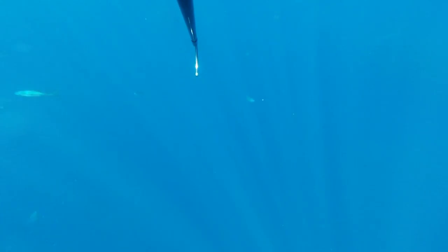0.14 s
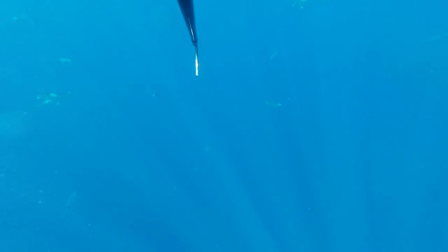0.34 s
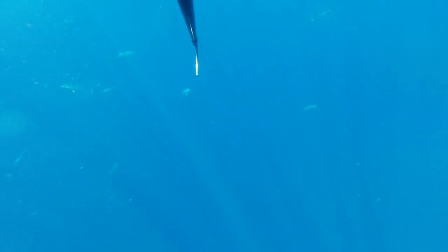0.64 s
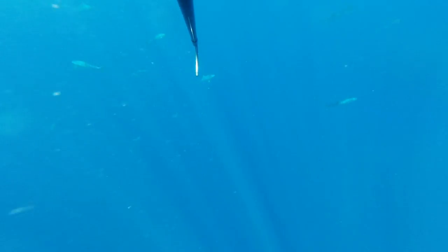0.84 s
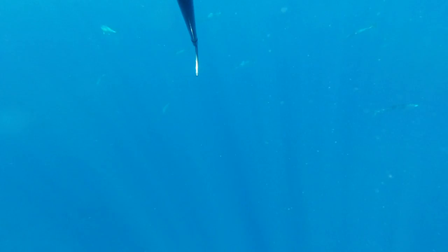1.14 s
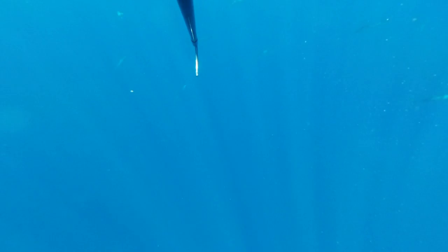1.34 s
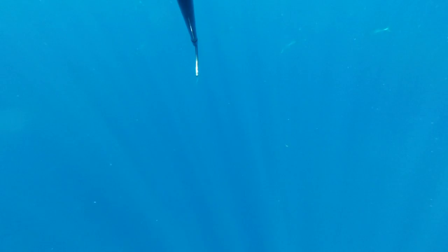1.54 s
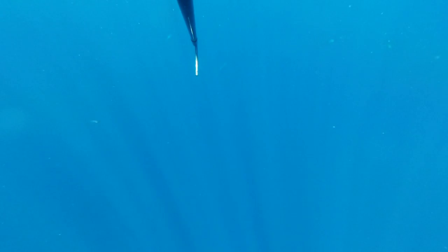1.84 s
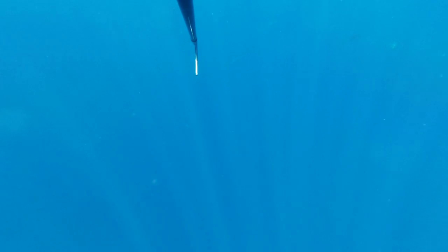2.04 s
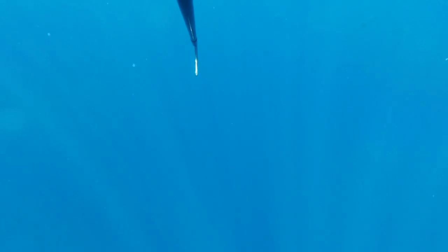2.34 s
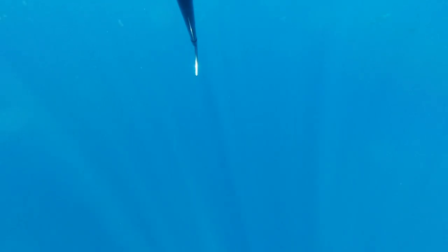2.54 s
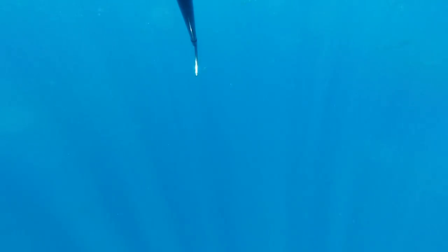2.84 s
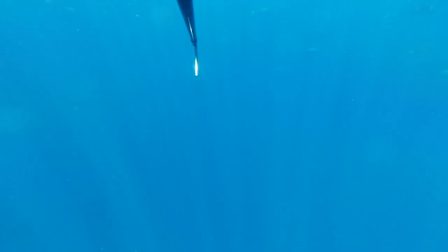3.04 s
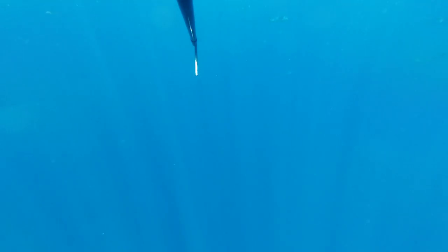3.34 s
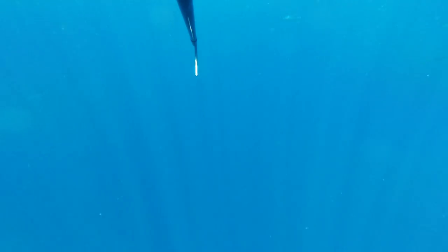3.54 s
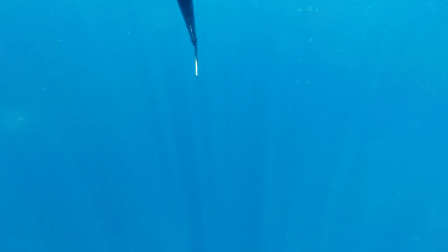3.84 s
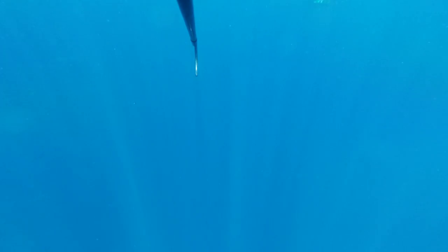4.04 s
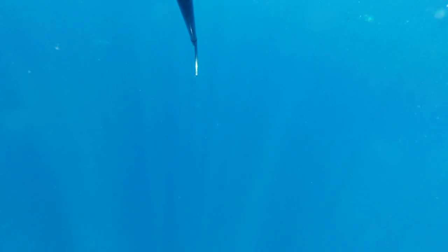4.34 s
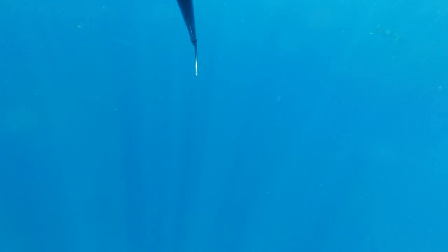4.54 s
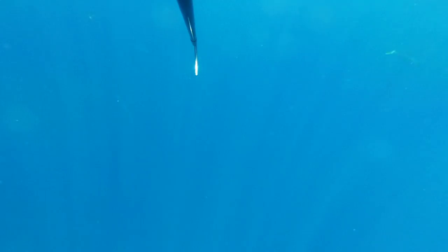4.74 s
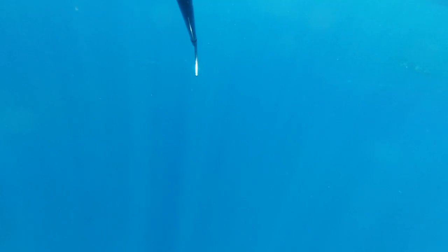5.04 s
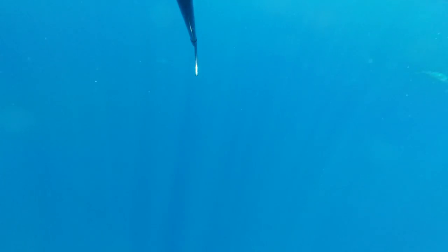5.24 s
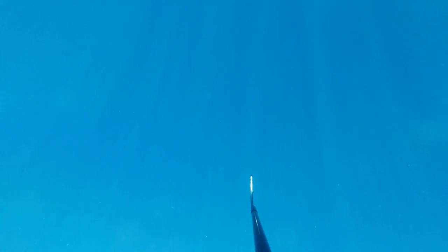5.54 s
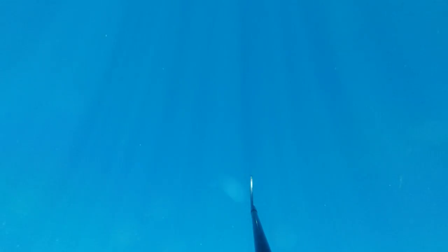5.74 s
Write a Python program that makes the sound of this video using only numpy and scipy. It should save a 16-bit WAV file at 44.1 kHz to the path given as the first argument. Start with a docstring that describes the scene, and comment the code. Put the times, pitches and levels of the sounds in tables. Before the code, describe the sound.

Muffled water flows around a pole and sealed housing, heard very close underwater: a low, lumpy rumble with a faint, steady fizz of bubbles. A small slosh and light clicks come at about 0.4 seconds. At 1.35 seconds a dull, deep blow leaves the pole ringing low, and the flow grows into a wavering hum. From 2.1 to 2.4 seconds comes the loudest event, a quick rattle of sharp knocks and hollow pops with a short wash of water. The drone continues, with a tick and a soft thud around 3.6 seconds, then dips near 4.3. Scattered dry ticks and small knocks run from 4.5 to 5.2 seconds as the flow returns. A light slosh and a sharper popping knock follow around 5.3, then a low, hollow bump at 5.6. The clicks and fizz carry a thin, gritty treble edge.

```python
"""Flowing water drums a pole and its sealed camera housing at their low modes, heard close, under water.
Eddies keep two modes swinging; fine bubbles and grit ring the shell. Water sloshes, the gear knocks,
rattles and ticks, short pops sound, and dull blows leave the pole ringing low. A sample-and-hold
at 8000 Hz mirrors every sound in the treble."""
import sys
import numpy as np
from scipy import signal
from scipy.fft import rfft, irfft, next_fast_len
from scipy.io import wavfile
from scipy.ndimage import uniform_filter1d, map_coordinates

SR = 44100
rng = np.random.default_rng(int(sys.argv[2]) if len(sys.argv) > 2 else 0)


def put_to_file(sound):
    """Save the sound as 16-bit audio at rate SR, in the file named by the first command-line argument."""
    columns = np.atleast_2d(sound).T  # one column per channel
    safe = np.clip(columns, -1, 1)
    whole_steps = np.round(safe * 32767)
    wavfile.write(sys.argv[1], SR, whole_steps.astype(np.int16))


N = 259308

# water pushing the pole: time_s, strength_db
FLOW_STRENGTH = [(0, -56.5), (.13, -54.5), (.43, -55.5), (.6, -51.5), (1.0, -57.5), (1.34, -55.5),
                 (1.35, -45), (1.75, -45.5), (2.1, -41.5), (2.27, -46), (2.4, -42), (2.68, -46.5),
                 (2.87, -39.5), (3.15, -44), (3.41, -40), (3.55, -48), (3.9, -41), (4.18, -44), (4.3, -56),
                 (4.43, -61), (4.67, -54), (5.16, -46.5), (5.45, -47), (5.88, -50)]
# low modes of pole and housing, four groups: freq_hz, width_hz, gain_db
POLE_MODES = [
    [(33.4, 6, -3), (49.4, 11.6, -6.5), (62, 5.3, -3.5), (97.3, 7.9, -2.5)],
    [(144.1, 3.3, 2.5), (171, 60, -7), (191.2, 3.5, -0.5)],
    [(235.4, 9.4, 0.5), (251.3, 23.4, -2)],
    [(303, 18.3, 1.5), (337, 58, 2.5), (385.6, 10, 8.5), (402, 55, -11), (440.5, 5.4, 10.5), (520, 30, -34)],
]
# flow response per pole group: gain_db, swing_ratio, wander_db, low_hz, high_hz
POLE_GROUPS = [(1, 1.23, 1.2, 40, 97), (-2, 1.17, 2.5, 98, 195), (-5.5, 0.84, 3.5, 195, 210),
               (-6.5, .5, 2.5, 256, 507)]
# lower eddy-driven mode: time_s, level_db
SWAY_LEVEL = [(0, -58), (.2, -51), (.34, -43), (.42, -56.5), (.66, -48.5), (.9, -54.5), (1.34, -46.5),
              (1.35, -29), (1.45, -31), (1.6, -38.5), (1.7, -42), (2.0, -57), (2.21, -41), (2.28, -64.5),
              (2.5, -44), (2.6, -54.5), (3.05, -45), (3.5, -38), (3.62, -47), (3.82, -36.5), (3.94, -44.5),
              (4.16, -49), (4.25, -62), (5.0, -57), (5.64, -45), (5.88, -48)]
# upper eddy-driven mode: time_s, level_db
DRONE_LEVEL = [(0, -56), (.66, -60.5), (1.34, -63), (1.35, -56), (1.5, -47), (1.58, -57), (1.69, -42),
               (2.02, -38.5), (2.2, -48), (2.31, -38.5), (2.45, -40), (2.52, -46.5), (2.78, -42),
               (3.0, -45.5), (3.1, -59), (3.45, -47.5), (3.66, -56), (3.72, -44), (4.16, -40.5),
               (4.25, -65), (4.5, -73), (4.76, -56.5), (4.98, -48.5), (5.12, -54), (5.3, -48.5),
               (5.45, -57), (5.64, -51), (5.88, -64)]
# bubbles and grit on the shell: time_s, level_db
FIZZ_LEVEL = [(0.0, -48), (0.36, -48.5), (0.59, -47), (1.13, -49), (1.42, -51), (2.06, -53), (2.18, -54),
              (2.29, -49), (3.91, -47), (4.24, -51.5), (4.52, -52), (4.9, -45), (5.17, -45), (5.88, -47)]
# shell modes, low and high group: freq_hz, width_hz, gain_db
SHELL_MODES = [
    [(656, 106, -0.5), (850, 62, 4.5), (881.6, 31, 10.5), (1082, 25, 15), (1186, 154, 3.5)],
    [(1462, 120, 1.5), (1531, 140, 1.5), (1715, 103, 2), (1868, 210, -0.5), (1952, 37, 6), (2111, 59, 5.5),
     (2330, 75, 3)],
]
# shell roll-off above its last modes: freq_hz, gain_db
SHELL_ROLLOFF = [(2230, -1.5), (2320, -2), (2480, -18), (2560, -9)]
# thin hiss spectrum: freq_hz, gain_db
HISS_SPECTRUM = [(2200, 4), (2550, -3), (2750, -3), (2950, -5), (3250, -5.5), (3600, -11.5), (3850, -13),
                 (4000, -19.5)]
# sloshes over the shell: start_s, level_db, t60_s, low_hz, high_hz
SLOSHES = [(0.376, -48, .18, 665, 1150), (.471, -49, 0.1, 300, 500), (.655, -54.5, 0.076, 2500, 3650),
           (2.126, -47, 0.031, 1500, 3700), (2.146, -27, 0.019, 500, 3600), (2.172, -27, 0.031, 500, 3620),
           (2.252, -57, 0.14, 694, 3250), (2.34, -46, .095, 705, 1150), (2.688, -44.5, 0.2, 810, 1980),
           (5.12, -40.5, 0.18, 684, 1430), (5.325, -43.5, 0.084, 700, 2330)]
# gear knocks: start_s, level_db, centre_hz, reach_octaves, ring_ratio
KNOCKS = [(.385, -34, 1020, .3, 0.67), (0.411, -37, 1024, 0.17, 3.2), (.424, -33.5, 2240, 0.16, 0.63),
          (1.35, -29, 450, 0.8, 0.87), (1.685, -33.5, 905, 0.16, 0.77), (1.944, -32.5, 2240, 0.18, 0.9),
          (2.143, -25.5, 1330, .6, 1.05), (2.145, -13.5, 3320, .1, 1.4), (2.158, -21, 1310, .6, 0.56),
          (2.171, -11, 1100, .5, 0.24), (2.174, -13, 2150, .1, 1.6), (2.179, -5.5, 2300, .4, 0.79),
          (2.1815, -5, 2000, .12, 0.93), (2.183, 0, 2200, .1, 0.78), (2.1842, -1, 2860, 0.17, 0.83),
          (2.214, -26.5, 2050, .2, 0.48), (2.232, -23.5, 1490, 0.42, 0.83), (2.263, -29, 920, .15, 0.85),
          (2.264, -19.5, 1940, 0.14, 0.69), (2.271, -31, 1600, .3, 1.8), (2.316, -32.5, 1890, .2, .9),
          (2.375, -37, 1720, .1, 2.5), (4.024, -33, 1640, 0.13, 1.1), (4.487, -41, 2120, 0.17, 1.2),
          (4.508, -39, 2080, .15, .9), (4.553, -40, 1930, 0.14, 1.6), (4.564, -33.5, 2230, .15, 0.56),
          (4.6676, -18.5, 2360, .6, 0.44), (4.668, -28, 1110, 0.28, 1.02), (5.324, -27.5, 1300, 0.57, 1.1),
          (5.327, -30.5, 2300, .15, 1.7), (5.595, -36, 900, 0.88, 1.8), (5.649, -34.5, 1830, .2, 1.8),
          (5.653, -42, 900, .2, 1.6)]
# gear modes: freq_hz, gain_db, t60_s
GEAR_MODES = [(419, -11, .05), (905, 3.1, 0.026), (1165, -2.5, 0.023), (1731, 0.5, 0.011),
              (1988, -0.3, 0.021), (2266, -0.8, 0.011), (2805, 6.5, 0.0044), (3334, -6.5, 0.019)]
# dry ticks: start_s, level_db
TICKS = [(0.4218, -31), (.4758, -42), (.871, -37), (2.215, -28), (2.232, -40), (2.2656, -35), (2.2746, -42),
         (2.317, -41), (2.327, -48), (2.367, -39), (3.5783, -32.5), (3.6237, -46), (3.688, -39),
         (4.5635, -32), (4.7403, -27), (4.8709, -27.5), (4.9417, -39), (5.1646, -30), (5.4331, -32),
         (5.4464, -44), (5.4665, -34), (5.3374, -46), (5.667, -34), (5.7214, -43.5)]
# tick spectrum: freq_hz, gain_db
TICK_SPECTRUM = [(1200, -24.5), (1900, -2.5), (2500, -7), (3200, -1.5), (3700, -15), (3990, -33)]
# short pops, and the pole's low ring after a blow: start_s, peak_db, pitch_hz, rise_s, t60_s
POPS_AND_RINGS = [(.43, -40.5, 676, .006, 0.077), (1.36, -39, 145.6, .005, .6),
                  (2.176, -13.5, 986, 0.0031, 0.0325), (2.19, -31.5, 1036, .003, 0.065),
                  (2.273, -33.5, 1254, .0016, .064), (2.316, -15, 833, 0.0036, .033),
                  (2.318, -31, 595, .002, 0.044), (2.367, -14, 1806, .0028, 0.013),
                  (2.368, -22.5, 897, 0.0055, 0.064), (4.523, -43.5, 297, .0045, .066),
                  (4.939, -34.5, 332, 0.0033, 0.052), (5.036, -32, 131, .007, 0.062),
                  (5.322, -21, 1229, 0.0016, .028), (5.331, -26.5, 1204, .0007, 0.045),
                  (5.594, -29.5, 430, 0.0027, 0.091), (5.596, -30, 187.5, .006, 0.22)]
# blows on the pole: start_s, push_db, contact_s
THUDS = [(1.35, 34, 0.00092), (1.356, 53.5, 0.0052), (1.373, 49, 0.0071), (1.686, 25, 0.00043),
         (1.694, 35, 0.0018), (2.18, 30.5, 0.0013), (3.715, 32.5, 0.0017), (4.666, 18, .00085),
         (5.325, 26, 0.0013), (5.594, 28, 0.0014), (5.609, 26.5, 0.0018)]
# share of a blow per pole group: gain_db
THUD_SHARES_DB = [-0.2, -1.5, 3.5, -3]
# output treble loss: freq_hz, gain_db
TREBLE_LOSS = [(100, 0), (13500, 0), (14800, -6), (15300, -9), (15600, -26), (16400, -26)]


def amp(db):
    return 10 ** (np.asarray(db) / 20)


def unit_rms(x):
    return x / np.sqrt(np.mean(x ** 2) + 1e-20)


def gain_at(points, hz):
    """Gain from (freq_hz, gain_db) points, on a log frequency axis."""
    freq_hz, gain_db = np.transpose(points)
    return amp(np.interp(np.log(hz + 1), np.log(freq_hz + 1), gain_db))


def curve(points):
    """(time_s, value) points, interpolated per sample."""
    return np.interp(np.arange(N) / SR, *np.transpose(points))


def wobble(rate_hz):
    """Smooth random curve, rate_hz knots a second."""
    knots = rng.standard_normal(int(N * rate_hz / SR) + 4)
    return map_coordinates(knots, [np.arange(N) * rate_hz / SR])


def filtered(x, response):
    """Apply a complex frequency response."""
    size = next_fast_len(N + SR // 2)
    return irfft(rfft(x, size) * response(np.fft.rfftfreq(size, 1 / SR)), size)[..., :N]


def resonances(f, modes, flip=1):
    """Causal sum of modes; flip=1 leaves a valley between neighbours."""
    return sum(flip ** k * amp(db) * 1j * f * width_hz / (hz * hz - f * f + 1j * f * width_hz)
               for k, (hz, width_hz, db) in enumerate(modes))


def band(f, low_hz, high_hz):
    """Band-pass gain, fourth-order skirts."""
    return 1 / np.sqrt((1 + (low_hz / (f + 1)) ** 8) * (1 + (f / high_hz) ** 8))


def envelope(t, rise_s, t60_s):
    """Fast swell, exponential decay, peak 1."""
    shape = (1 - np.exp(-t / max(rise_s, 1e-4))) ** 2 * amp(-60 * t / t60_s)
    return shape / shape.max()


def tones(rows, roughness, samples):
    """One decaying tone per row, wandering in phase."""
    out, t = np.zeros(N + SR), np.arange(samples) / SR
    for start_s, peak_db, pitch_hz, rise_s, t60_s in rows:
        drift_rad = roughness / 4 * np.cumsum(uniform_filter1d(rng.standard_normal(samples), size=24))
        tone = np.sin(2 * np.pi * pitch_hz * t + drift_rad)
        out[round(start_s * SR):][:samples] += amp(peak_db) * envelope(t, rise_s, t60_s) * tone
    return out[:N]


def flow(pivot_db=-48):
    """Turbulent water shakes each group of low modes in lumps."""
    out, shared_lumps = np.zeros(N), wobble(11)
    excess_db = curve(FLOW_STRENGTH) - pivot_db
    for modes, (gain_db, swing_ratio, wander_db, *edges_hz) in zip(POLE_MODES, POLE_GROUPS):
        push = amp(0.42 * shared_lumps + 0.81 * wobble(25)) * rng.standard_normal(N)
        level_db = pivot_db + gain_db + swing_ratio * excess_db + wander_db * wobble(5)
        drumming = filtered(push, lambda f: resonances(f, modes) * band(f, *edges_hz))
        out += amp(level_db) * unit_rms(drumming)
    return out


def eddies(sway_hz=33.8, drone_hz=256.6):
    """Eddies lock onto two modes and sustain them as wavering tones."""
    sway_rms = amp(curve(SWAY_LEVEL) + 2.5 * wobble(14))
    sway = np.sin(2 * np.pi * np.cumsum(sway_hz + 3 * wobble(8)) / SR)
    drone_rms = amp(curve(DRONE_LEVEL) + 2.8 * wobble(26))
    drone = np.sin(2 * np.pi * np.cumsum(drone_hz + 2.26 * wobble(12)) / SR)
    return np.sqrt(2) * (sway_rms * sway + drone_rms * drone)


def fizz(grains_per_s=300, low_db=-1.5, high_db=-2.5, hiss_db=-13.5):
    """Bubbles and grit, a patter on noise, ring the shell; a thin hiss lies above."""
    level_db = curve(FIZZ_LEVEL)
    grains = unit_rms((rng.random(N) < grains_per_s / SR) * rng.standard_normal(N))
    swell_db = 1.2 * wobble(30)
    drive = amp(swell_db) * (rng.standard_normal(N) + 0.64 * grains)
    low = filtered(drive, lambda f: resonances(f, SHELL_MODES[0]) * band(f, 540, 1270))
    high = filtered(drive, lambda f: resonances(f, SHELL_MODES[1]) * band(f, 1370, 2320)
                    * gain_at(SHELL_ROLLOFF, f))
    hiss_drive = amp(swell_db + 1.75 * wobble(60)) * (rng.standard_normal(N) + 0.26 * grains)
    hiss = filtered(hiss_drive, lambda f: gain_at(HISS_SPECTRUM, f) * band(f, 1800, 3990))
    return (amp(level_db + low_db) * unit_rms(low)
            + amp(level_db + high_db) * unit_rms(high)
            + amp(level_db.mean() + hiss_db) * unit_rms(hiss))


def sloshes(rise_per_t60=0.089, lumps_per_s=150):
    """Water washes over the shell in lumpy bursts of band-limited noise."""
    out, t = np.zeros(N + SR), np.arange(SR // 3) / SR
    for start_s, level_db, t60_s, *edges_hz in SLOSHES:
        bandpass = signal.butter(3, edges_hz, "bandpass", fs=SR, output="sos")
        lumps = amp(3.5 * np.interp(t * lumps_per_s, np.arange(60), rng.standard_normal(60)))
        wash = unit_rms(signal.sosfilt(bandpass, lumps * rng.standard_normal(len(t))))
        shape = envelope(t, rise_per_t60 * t60_s, t60_s)
        out[round(start_s * SR):][:len(t)] += amp(level_db) * shape * wash
    return out[:N]


def knocks(rise_per_t60=0.1):
    """Each knock rings the same gear modes, favouring those near its centre frequency."""
    rows = []
    for start_s, level_db, centre_hz, reach_octaves, ring_ratio in KNOCKS:
        for freq_hz, gain_db, t60_s in GEAR_MODES:
            peak_db = level_db + gain_db - 6 * (np.log2(freq_hz / centre_hz) / reach_octaves) ** 2
            ring_s = t60_s * ring_ratio
            rows.append((start_s, peak_db, freq_hz, rise_per_t60 * ring_s, ring_s))
    return tones(rows, roughness=0.37, samples=SR // 14)


def ticks(t60_s=0.024):
    """The gear ticks: short puffs of bright noise."""
    gate, t = np.zeros(N + SR), np.arange(SR // 15) / SR
    for start_s, level_db in TICKS:
        gate[round(start_s * SR):][:len(t)] += amp(level_db - 60 * t / t60_s)
    return filtered(gate[:N] * rng.standard_normal(N), lambda f: gain_at(TICK_SPECTRUM, f))


def pops_and_rings():
    """Single decaying tones: short pops, and the pole's low ring after a blow."""
    return tones(POPS_AND_RINGS, roughness=0.1, samples=SR // 5)


def thuds(grip_widening=4.54):
    """Short, soft pushes ring the pole modes; the grip damps them more than in free flow."""
    pushes, t = np.zeros(N + SR), np.arange(SR // 20) / SR
    for start_s, push_db, contact_s in THUDS:
        pulse = t / contact_s ** 2 * np.exp(-t / contact_s) / SR
        pushes[round(start_s * SR):][:len(t)] += amp(push_db) * pulse
    out = np.zeros(N)
    for k, (modes, share_db) in enumerate(zip(POLE_MODES, THUD_SHARES_DB)):
        damped = [(hz, grip_widening * width_hz, db) for hz, width_hz, db in modes]
        ring = filtered(pushes[:N], lambda f: resonances(f, damped, flip=-0.84))
        out += (-1) ** k * amp(share_db) * ring
    return out


def scene():
    """All sources, summed to mono."""
    return (flow() + eddies() + fizz() + sloshes() + knocks() + ticks() + pops_and_rings() + thuds())[None]


def record(dry, rate_hz=8000, repeats=6, bass_cut_hz=27, clip_level=0.82, top_hz=16400):
    """Bass cut, soft clip, then sample-and-hold: steps mirror the sound about multiples of rate_hz."""
    highpass = signal.butter(4, bass_cut_hz, "highpass", fs=SR, output="sos")
    sampled = signal.resample_poly(signal.sosfilt(highpass, dry), rate_hz, SR, axis=1)
    clipped = sampled / (1 + np.abs(sampled / clip_level) ** 6) ** (1 / 6)
    steps = np.repeat(clipped, repeats, axis=1)
    held = signal.resample_poly(steps, SR, rate_hz * repeats, axis=1)[:, :N]
    return filtered(held, lambda f: gain_at(TREBLE_LOSS, f) * (f < top_hz))


dry = scene()
out = record(dry)
put_to_file(out)
```